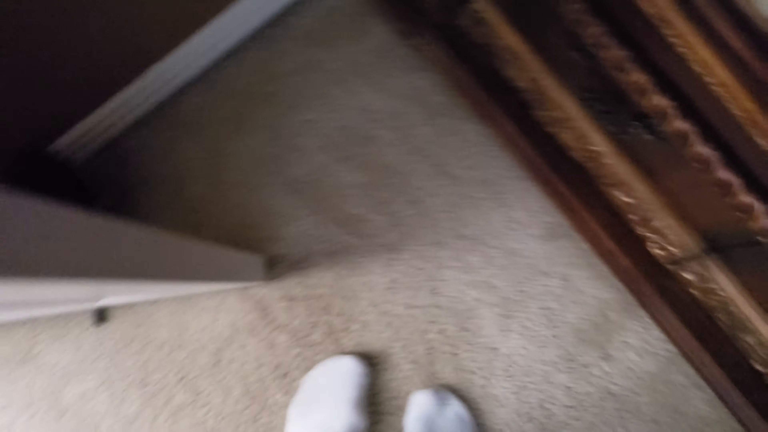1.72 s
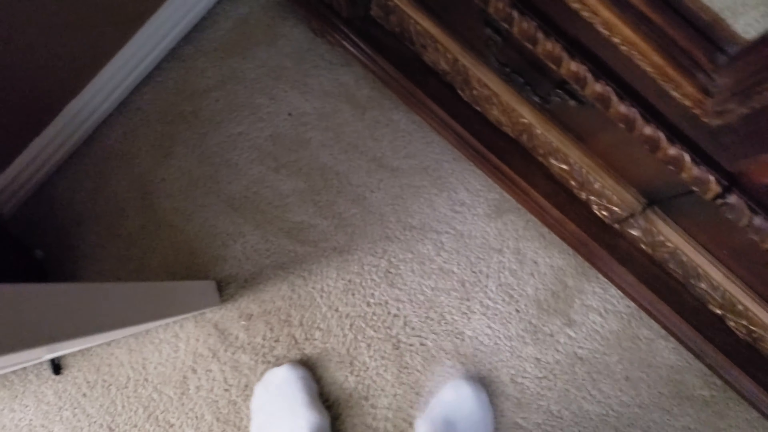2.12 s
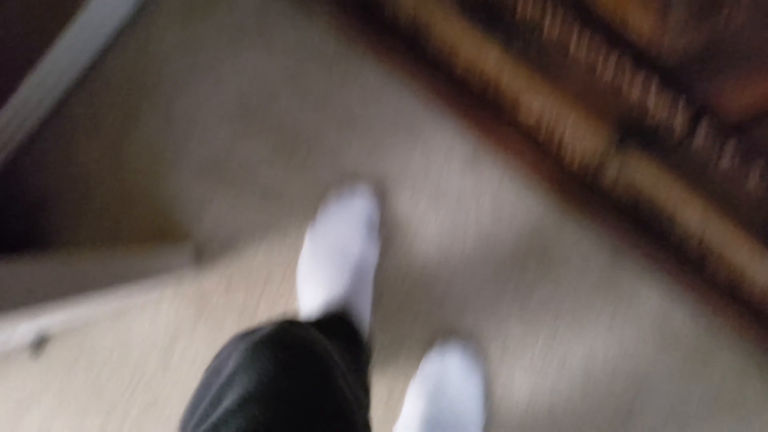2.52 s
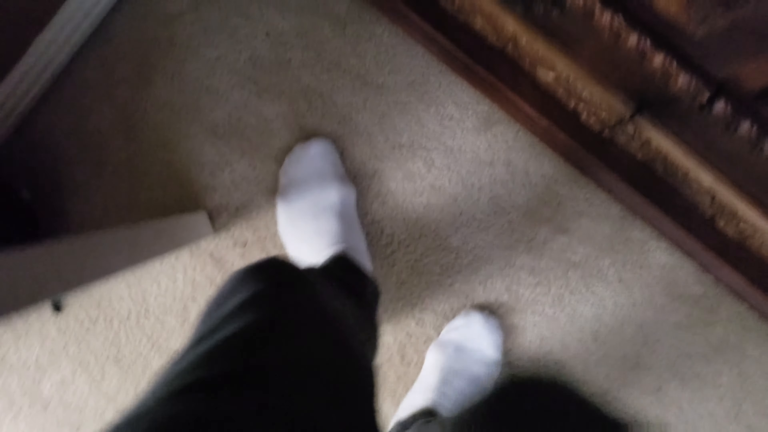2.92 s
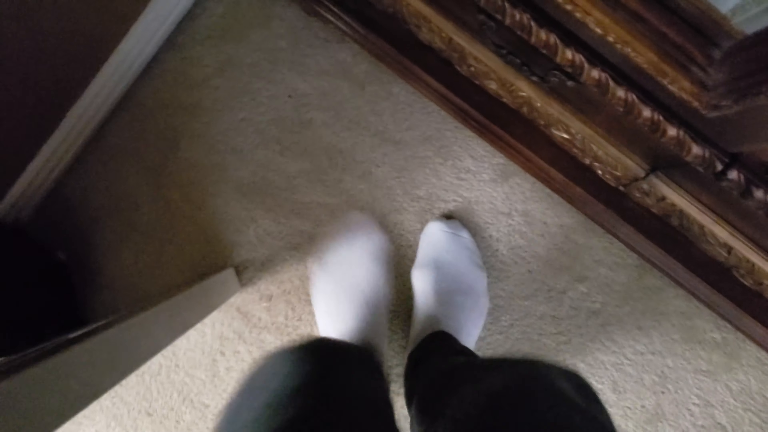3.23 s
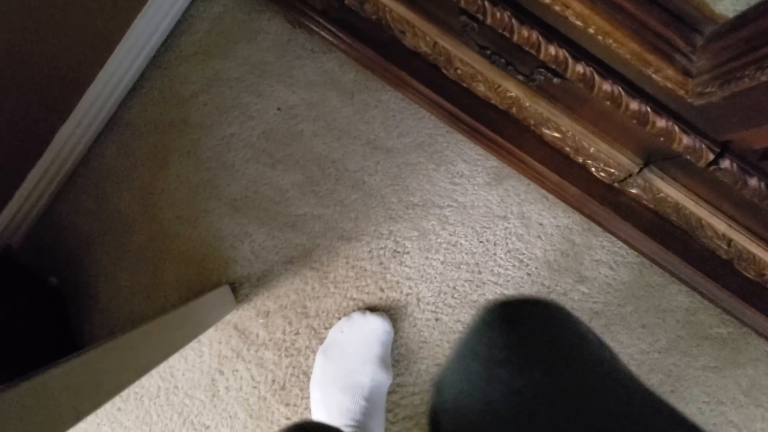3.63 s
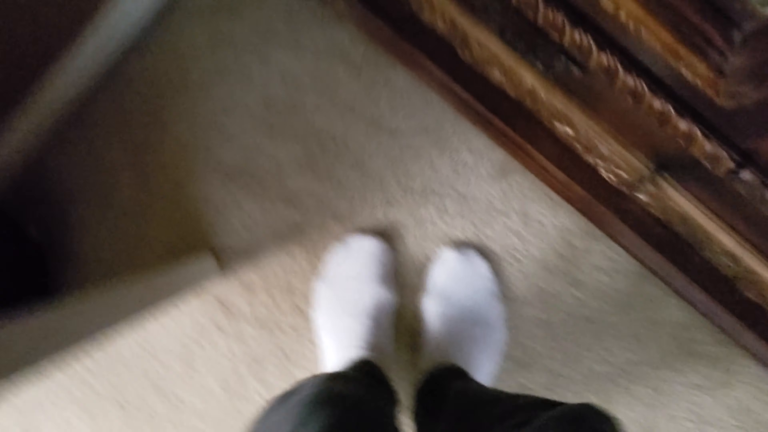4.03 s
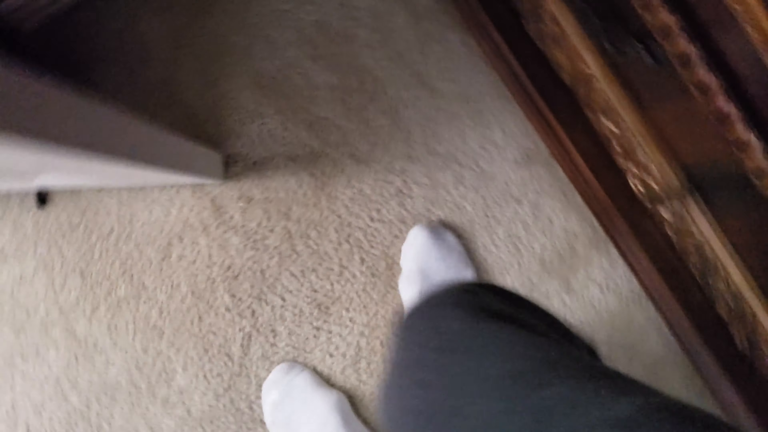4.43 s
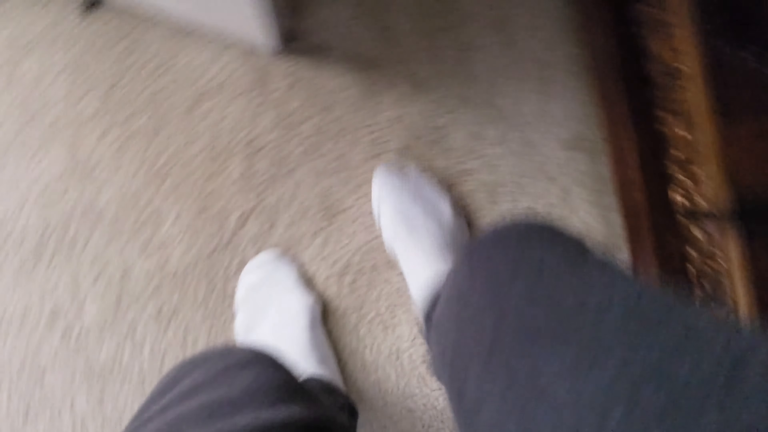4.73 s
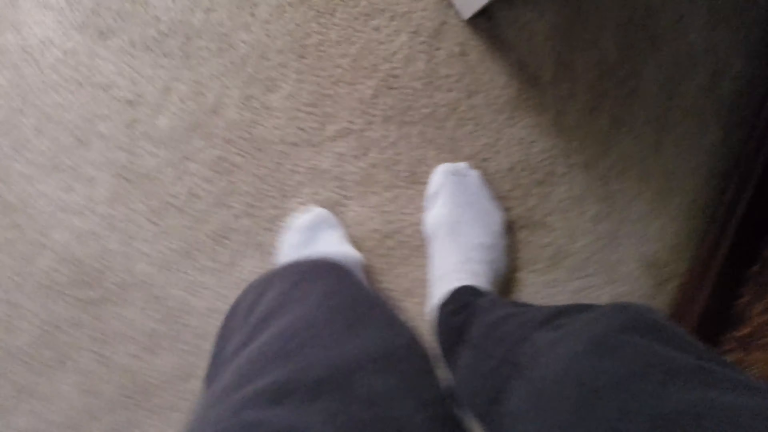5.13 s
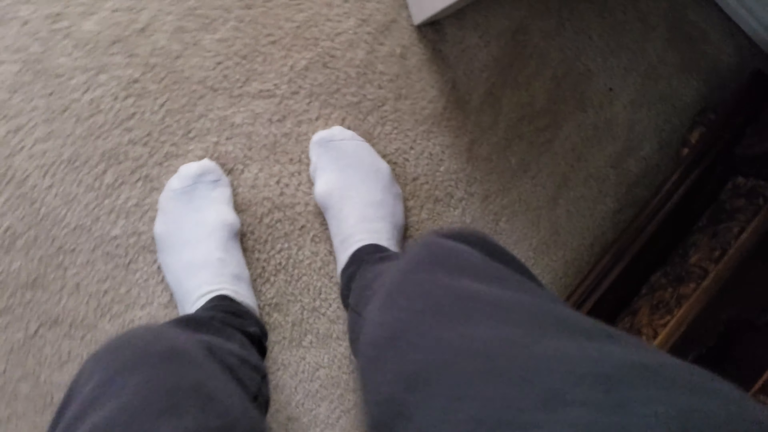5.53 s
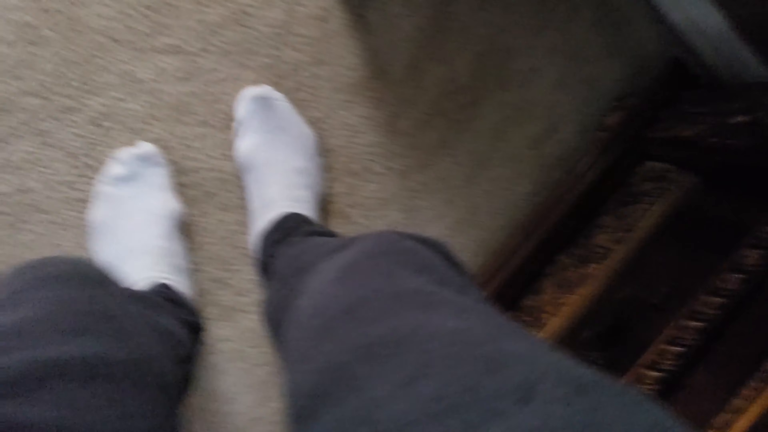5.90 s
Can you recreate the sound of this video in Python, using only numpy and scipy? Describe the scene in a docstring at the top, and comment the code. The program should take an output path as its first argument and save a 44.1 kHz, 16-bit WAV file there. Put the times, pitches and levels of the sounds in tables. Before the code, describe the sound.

Someone in socks and soft trousers shuffles on carpet. Two sharp, dry wooden cracks at about half a second are the loudest events. After a pause come brief airy cloth strokes and soft low footfalls, one distinctly heavier near four seconds, then two barely audible squeaks and lighter rustles leaning left. Small furnished room, short damped tail, stereo microphone held by the walker.

```python
"""A quiet room with faint steady air; someone in socks and soft trousers shuffles about on a carpeted floor.
First come a slow, heavy drag of cloth, a faint sock squeak, a footfall and a few brushing strokes of cloth;
among them something wooden cracks twice, each crack a quick run of slips that snap and ring the wood's modes.
After a short rest come more strokes, shaped noise that swells with the speed of the leg, with thuds as the
weight comes down, short sinking tones with dull noise. Two fainter squeaks come late; the strokes end softly."""
import sys
import numpy as np
from scipy import signal
from scipy.fft import rfft, irfft
from scipy.io import wavfile
from scipy.ndimage import uniform_filter1d

SR = 44100
rng = np.random.default_rng(int(sys.argv[2]) if len(sys.argv) > 2 else 0)


def unload_wav(signal):
    """Save mono or channel-first audio to the path in sys.argv[1] as 16-bit WAV at rate SR, clipped to [-1, 1]."""
    wavfile.write(
        sys.argv[1],
        SR,
        np.round(np.clip(np.atleast_2d(signal).T, -1, 1) * 32767).astype(np.int16),
    )


N = 267246
TIME = np.arange(N) / SR
BINS = np.maximum(np.fft.rfftfreq(N, 1 / SR), 1)   # Hz, kept above 0 for the log axis
SPLIT = np.array([[0.5], [-0.5]])   # shares a left-minus-right difference between the sides


def from_db(db):
    """Decibels to gain."""
    return 10 ** (np.asarray(db) / 20)


def at_bins(points):
    """A spectrum table joined by straight lines on a log-frequency axis."""
    hz, value = np.transpose(points)
    return np.interp(np.log(BINS), np.log(hz), value)


def drift(rate_hz):
    """Smooth random wander of spread 1, with little movement faster than the rate."""
    slow = irfft(rfft(rng.standard_normal(N)) / (1 + (BINS / rate_hz) ** 2), N)
    return slow / slow.std()


# how alike the two sides of a noise are: frequency_hz, likeness (0 to 1)
SIDE_LIKENESS = [(40, 0.4), (130, 0.97), (290, .8), (640, 0.4), (1400, 0.09), (4000, 0.15), (8000, 0)]


def noise(spectrum, band=(0, SR)):
    """Stereo noise, most alike on both sides in the bass, scaled to rms 1 inside the band (Hz)."""
    gain = from_db(at_bins(spectrum))
    alike = np.clip(at_bins(SIDE_LIKENESS), 0, 1)
    in_band = (BINS > band[0]) * (BINS < band[1])
    gain = gain / np.sqrt(np.mean(gain ** 2 * in_band))
    mid, side = rfft(rng.standard_normal((2, N)))
    shared = np.sqrt((1 + alike) / 2) * mid
    opposed = np.sqrt((1 - alike) / 2) * side * [[1], [-1]]
    return irfft(gain * (shared + opposed), N)


def soften(x, hz):
    """One-pole low-pass."""
    r = np.exp(-2 * np.pi * hz / SR)
    return signal.lfilter([1 - r], [1, -r], x)


def dying(t, t60):
    """A level that falls 60 dB in t60 seconds."""
    return np.exp(-np.log(1000) * t / t60)


def held(start, end, attack, release):
    """An envelope that rises from start, holds at 1 and falls to 0 at the end; all in seconds."""
    return np.clip(np.minimum((TIME - start) / attack, (end - TIME) / release), 0, 1)


def add(out, s, sound):
    """Mix a sound in from time s."""
    start = int(s * SR)
    out[..., start:start + sound.shape[-1]] += sound[..., :N - start]


# spectrum of the still air: frequency_hz, density_db (dB per Hz, relative)
AIR_SPECTRUM = [(20, -14), (45, 4.5), (85, 3), (140, -8), (250, -15), (450, -19.5), (900, -26),
                (2500, -30.5), (6000, -34.5), (10000, -31), (14000, -27.5)]
ROOM_AIR_DB = -66.5


def room_air():
    """The faint steady noise of the quiet room, heaviest in the bass."""
    return from_db(ROOM_AIR_DB) * noise(AIR_SPECTRUM)


ROOM_T60_S = 0.27


def room(x, wet_db=-13, first_echo_s=0.0055):
    """A short diffuse tail, damped by carpet and furniture, added to the direct sound."""
    t = TIME[:SR // 2]
    white = noise([(20, 0), (SR, 0)])[:, :len(t)]
    tail = white * dying(t, ROOM_T60_S) * (t > first_echo_s)
    tail = tail / np.sqrt(np.sum(tail ** 2) / 2)
    return x + from_db(wet_db) * signal.fftconvolve(x, tail, axes=1)[:, :N]


# faint squeaks of a twisting sock: peak_s, half_length_s, level_db
SOCK_SQUEAKS = [(0.25, 0.024, -61), (4.538, 0.066, -69.5), (4.81, 0.18, -75)]
SQUEAK_HZ, SQUEAK_WIDTH_HZ = 2520, 270


def squeaks():
    """Threads slip almost regularly for a moment: a narrow, rough tone."""
    resonance = 1 / (1 + (2 * (BINS - SQUEAK_HZ) / SQUEAK_WIDTH_HZ) ** 2)
    tone = irfft(rfft(rng.standard_normal((2, N))) * resonance, N)
    level = np.zeros(N)
    for peak_s, half_s, level_db in SOCK_SQUEAKS:
        level += from_db(level_db) * np.exp(-np.minimum(((TIME - peak_s) / half_s) ** 2, 20))
    return level * tone / tone.std()


# cracks of the wooden joint: snap_s, level_db, slipping_before_s, gain_per_later_slip_db
JOINT_CRACKS = [(0.5062, -23.5, 0, -0.75), (0.6061, -26, .01, -3)]
SLIP_GAP_S, SLIPS_AFTER = 0.0032, 3
SNAP_HZ, SLIP_DULLING = 7040, 1.6   # slips are duller the further they are from the snap
LEAD_IN_DB, LEAD_IN_DB_PER_SLIP = -2, 0.5


def slips(jitter=0.12):
    """The joint slips harder up to its snap, then on more dully: rows of (s, dB, low-pass Hz)."""
    rows = []
    for snap_s, level_db, before_s, after_db in JOINT_CRACKS:
        slips_before = round(before_s / SLIP_GAP_S)   # none when the joint snaps at once
        for k in range(-slips_before, SLIPS_AFTER + 1):   # k = 0 is the snap
            change_db = k * after_db if k >= 0 else LEAD_IN_DB + k * LEAD_IN_DB_PER_SLIP
            wander = jitter * rng.standard_normal() * (k != 0)
            when = snap_s + SLIP_GAP_S * (k + wander)
            rows.append((when, level_db + change_db, SNAP_HZ / (1 + SLIP_DULLING * abs(k))))
    return rows


# modes the wood rings with: frequency_hz, level_db (relative, varied at each slip), t60_s
WOOD_MODES = [(180, -32.5, 0.15), (283, -12, 0.094), (456, -15, 0.14), (550, -13.5, 0.15), (836, -19, 0.14),
              (898, -17, 0.061), (1120, -22.5, 0.17), (1274, -9.5, 0.024), (1372, -12, .05),
              (1795, -11, 0.074), (1980, -9.5, 0.032), (2160, -40, 0.053), (2680, -19, 0.056),
              (2900, -17, 0.028), (3030, -17, 0.03), (5170, -17, 0.02), (5700, -30, 0.0174)]
# spectrum of the splintering noise: frequency_hz, density_db (dB per Hz, relative)
SPLINTER_SPECTRUM = [(100, -18.5), (300, 12), (600, -8), (1500, -3.5), (3000, 1), (4000, -5), (6000, -2),
                     (7500, -7), (10000, -15.5), (15000, -21)]


def cracks(ring_db=-2.0, snap_db=-5.0, snap_t60=0.014, tail_db=-20, tail_t60=0.17,
           spread_db=4.5, apart_hz=480, pan_db=-1.5):
    """Every slip snaps, then rings the wood's modes; the high modes reach the two sides out of step."""
    out, t = np.zeros((2, N)), TIME[:SR // 3]
    splinter = noise(SPLINTER_SPECTRUM)
    hz, mode_db, t60 = np.transpose(WOOD_MODES)[:, :, None]
    apart = np.minimum(1, (hz / apart_hz) ** 2)
    # up to an eighth of a cycle each way
    lag = np.pi / 4 * apart * rng.choice([-1, 1], hz.shape) * np.array([1, -1])[:, None, None]
    snap_level = from_db(snap_db) * dying(t, snap_t60) + from_db(tail_db) * dying(t, tail_t60)
    for k, (s, level_db, bright_hz) in enumerate(slips()):
        strength = from_db(mode_db + ring_db + spread_db * rng.standard_normal(hz.shape))
        phase = 2 * np.pi * rng.random(hz.shape) + lag
        modes = strength * dying(t, t60) * np.sin(2 * np.pi * hz * t + phase)
        ring = np.sum(modes, axis=1)
        snap = splinter[:, k * len(t):(k + 1) * len(t)] * snap_level   # fresh noise for each slip
        add(out, s, soften(from_db(level_db) * (ring + snap), bright_hz))
    return out * from_db(pan_db * SPLIT)


def thud(hz, swell, sag=0.28, sag_s=0.028, pile_db=-14, pile_hz=200):
    """The carpet spreads a landing in time; the floor's note sinks as the load settles, the pile is crushed."""
    t = TIME[:SR // 3]
    load = (t / swell * np.exp(1 - t / swell)) ** 2   # peaks at 1 after the swell
    pitch = hz * (1 + sag * (2 * np.exp(-t / sag_s) - 1))   # from above hz to below it
    flex = np.sin(2 * np.pi * np.cumsum(pitch) / SR)
    pile = soften(soften(rng.standard_normal(len(t)), pile_hz), pile_hz)
    return load * (flex + from_db(pile_db) * pile / pile.std())


# footfalls: start_s, heel_db (before the common trim), mid_pitch_hz (the note sinks through it),
# swell_s, sole_against_heel_db
STEPS = [(0.319, -30, 111.2, 0.03, -20), (1.296, -51.5, 115, 0.024, -1), (1.407, -45, 66.6, 0.016, -9),
         (1.747, -48.5, 51, 0.046, -4), (1.894, -42.5, 99.5, 0.013, -1.5), (2.203, -47.5, 122, .028, -23),
         (2.273, -37.5, 53.5, .017, -6), (2.441, -47.5, 53.4, 0.027, -4), (3.174, -50, 67, .022, 5.5),
         (3.35, -46, 134, 0.025, -6), (3.645, -47.5, 101, 0.013, -9), (3.829, -28, 113.4, .013, -5),
         (3.87, -45, 43.4, 0.023, -6), (4.03, -43.5, 59.5, .018, -2.5), (4.37, -48, 87, 0.023, -3),
         (5.013, -47.5, 70, .021, -7), (5.254, -45.5, 97.5, 0.017, -8)]
# the sole follows the heel: later, lower, swelling more slowly, usually weaker
ROLL_SWELLS, SOLE_PITCH_RATIO, SOLE_SWELL_RATIO = 1.9, 0.603, 1.4


def thuds(level_db=-1.0):
    """Each foot lands on its heel and rolls onto the sole; a landing that swells slowly rolls slowly too."""
    out = np.zeros(N)
    for start_s, heel_db, hz, swell, sole_db in STEPS:
        heel = thud(hz, swell)
        sole = thud(SOLE_PITCH_RATIO * hz, SOLE_SWELL_RATIO * swell)
        add(out, start_s, from_db(heel_db) * heel)
        add(out, start_s + ROLL_SWELLS * swell, from_db(heel_db + sole_db) * sole)
    return from_db(level_db) * out


# spectra of the cloth, bright to dull: frequency_hz, density_db (dB per Hz, relative)
HISS_SPECTRUM = [(300, -42), (800, -1), (1500, -17.5), (2500, -10.5), (4000, -3.5), (5600, 1), (7000, 4.5),
                 (10000, -5), (13000, 0.5), (15500, -3.5)]
SCUFF_SPECTRUM = [(250, -23), (600, -3.5), (1100, 0), (1700, -1.5), (2100, -0.5), (2500, 2), (3400, -1.5),
                  (4500, -4.5), (7000, -11), (15000, -32)]
RUB_SPECTRUM = [(20, 10), (60, 2), (130, 10.5), (190, 5.5), (250, 3.5), (330, 0), (550, -1.5), (900, -10.5),
                (1300, -17.5), (2200, -18.5), (5000, -54)]


def fabric(hiss_db=0.49, scuff_db=-1.87, rub_db=-1.4, grain_db=1.0, catch_db=1.5):
    """Fibres hiss, the weave scuffs and catches, the fabric behind gives a dull rub."""
    catching = catch_db * drift(23)
    hiss_level_db = hiss_db + grain_db * drift(430) + 0.5 * catching
    scuff_level_db = scuff_db + grain_db * drift(350) + catching
    hiss = from_db(hiss_level_db) * noise(HISS_SPECTRUM, (4000, 15000))
    scuff = from_db(scuff_level_db) * noise(SCUFF_SPECTRUM, (1000, 4000))
    rub = from_db(rub_db) * noise(RUB_SPECTRUM, (250, 1000))
    return hiss, scuff, rub


# when the faint stirring of the clothes dies away: start_s, end_s
STIRRING_RESTS = [(.7, 1.356), (5.5, 6.9)]
STIR_DB, REST_FADE_S = -71, 0.32


def stirring(hiss, scuff, rub, scuff_db=-8.0, rub_db=-10.5):
    """The clothes stir faintly under everything, dying away during the rests."""
    rest = sum(held(start, end, REST_FADE_S, REST_FADE_S) for start, end in STIRRING_RESTS)
    blend = hiss + from_db(scuff_db) * scuff + from_db(rub_db) * rub
    return from_db(STIR_DB) * (1 - rest) * blend


DRAG_START_S, DRAG_END_S, DRAG_ATTACK_S, DRAG_RELEASE_S = 0.14, 0.809, 0.26, 0.11
DRAG_DB, DRAG_LOW_HZ = -51.5, 110   # it stirs little air below DRAG_LOW_HZ


def drag(rub):
    """One slow, heavy drag of cloth at the start: the dull rub alone, thinned in the bass."""
    envelope = held(DRAG_START_S, DRAG_END_S, DRAG_ATTACK_S, DRAG_RELEASE_S)
    return from_db(DRAG_DB) * envelope * (rub - soften(rub, DRAG_LOW_HZ))


# strokes of cloth: start_s, length_s, level_db (sets all layers), pressure_db
# (pressing harder adds scuff and rub to the hiss)
STROKES = [(0.208, 0.073, -58.5, -1.5), (0.317, 0.17, -55.5, -0.5), (0.48, 0.15, -59, -1),
           (0.59, 0.14, -71, 10.5), (1.261, 0.13, -60, 2.5), (1.501, .11, -56.5, 2.5),
           (1.66, 0.1, -57.5, 3.5), (1.887, .12, -48, -3.5), (2.106, .16, -54.5, -0.5),
           (2.405, 0.096, -45, -1.5), (2.653, 0.07, -62.5, -3), (3.13, 0.077, -47, -4.5),
           (3.315, 0.11, -49.5, -5), (3.58, 0.13, -49.5, -5), (3.79, 0.061, -47.5, -4.5),
           (3.991, 0.052, -45, -10), (4.183, 0.11, -64, -1), (4.347, 0.043, -63, -19),
           (4.456, 0.11, -56.5, -17.5), (4.579, 0.081, -49, -9.5), (4.801, 0.11, -60.5, 3.5),
           (4.96, 0.054, -54.5, -5.5), (5.146, 0.093, -65, -3.5), (5.294, .1, -62.5, -0.5),
           (5.493, 0.081, -61, 4), (5.774, 0.14, -67, -5.5)]
# where the moving leg is: time_s, left_minus_right_db
LEG_PAN = [(0.3, -1), (2.5, -1.1), (4.3, 0), (5.1, -8), (5.8, -7.5)]
SWELL_SHARE = 0.5   # part of a stroke spent speeding up
RUB_DB, RUB_FOLLOWS = -4, 0.43   # dull rub against the hiss; its dB per dB of pressure


def strokes(hiss, scuff, rub, steepness=2.69):
    """Each stroke speeds up and slows down, and the cloth sounds with its speed."""
    out = np.zeros((2, N))
    for start, length, level_db, pressure_db in STROKES:
        swell, fade = SWELL_SHARE * length, (1 - SWELL_SHARE) * length
        near = np.flatnonzero((TIME > start - swell) & (TIME < start + length + fade))
        t = TIME[near] - start - swell   # 0 at top speed
        speed = np.exp(-np.abs(t / np.where(t < 0, swell, fade)) ** steepness)
        pan = from_db(np.interp(start, *np.transpose(LEG_PAN)) * SPLIT)
        bright = hiss[:, near] + from_db(pressure_db) * scuff[:, near]
        dull = from_db(RUB_DB + RUB_FOLLOWS * pressure_db) * rub[:, near]
        out[:, near] += from_db(level_db) * speed * (pan * bright + dull)
    return out


def folding(x, depth_db=2.25):
    """Moving folds of cloth colour the rustle with shifting peaks and dips."""
    spectra = signal.stft(x, nperseg=512)[2]
    field = rng.standard_normal(spectra.shape[1:])
    for _ in range(2):   # smooth twice over frequency, then time
        field = uniform_filter1d(field, size=4, axis=0)
        field = uniform_filter1d(field, size=14, axis=1)
    return signal.istft(spectra * from_db(depth_db * field / field.std()))[1][:, :N]


def cloth():
    """The same rubbing fabric stirs, drags and swishes, coloured by its folds."""
    hiss, scuff, rub = fabric()
    return folding(stirring(hiss, scuff, rub) + drag(rub) + strokes(hiss, scuff, rub))


def scene():
    """Squeaks, wood, floor and cloth in the room, over its faint steady air."""
    return room_air() + room(squeaks() + cracks() + thuds() + cloth())


CUTOFF_HZ = 15600


def record(dry, notch_hz=8600, notch_width_hz=2600, notch_db=-14):
    """The microphone port has a dip in the treble; the top is cut."""
    b, a = signal.iirnotch(notch_hz, notch_hz / notch_width_hz, fs=SR)
    kept = from_db(notch_db)   # what is left at the bottom of the dip
    coloured = kept * dry + (1 - kept) * signal.lfilter(b, a, dry)
    top_cut = signal.ellip(10, 0.2, 70, CUTOFF_HZ - 300, fs=SR, output="sos")   # passband ends just below
    return signal.sosfilt(top_cut, coloured)


dry = scene()
out = record(dry)
unload_wav(out)
```